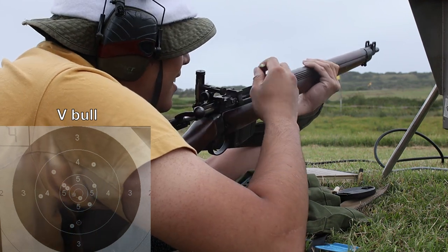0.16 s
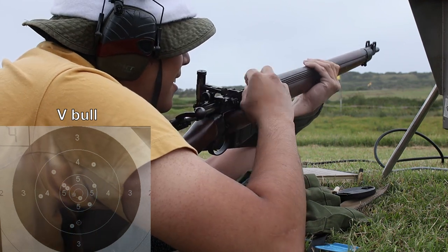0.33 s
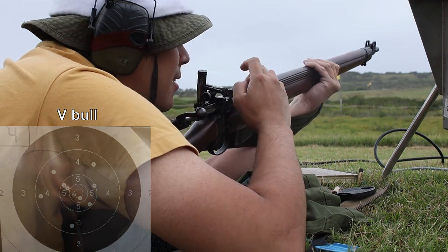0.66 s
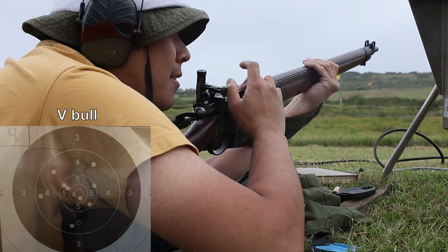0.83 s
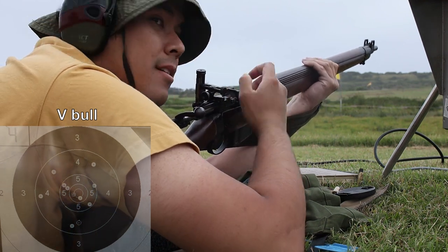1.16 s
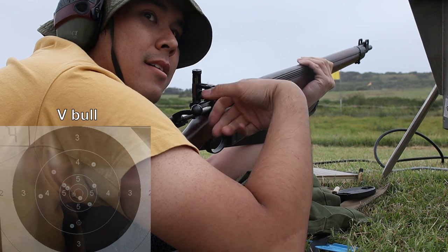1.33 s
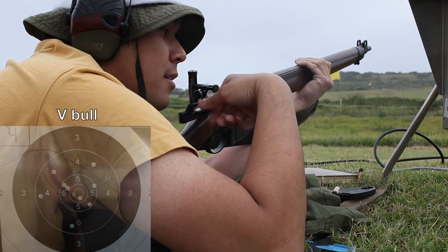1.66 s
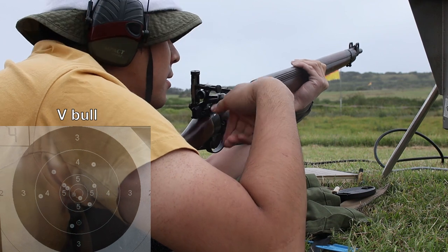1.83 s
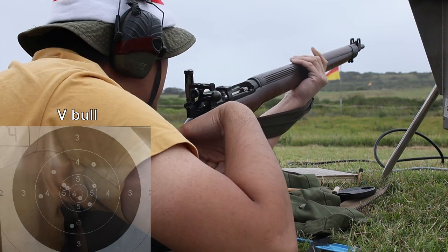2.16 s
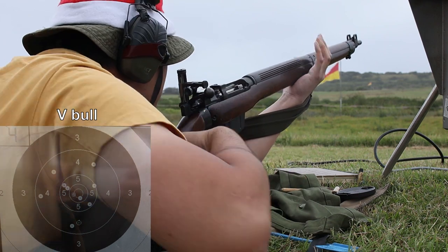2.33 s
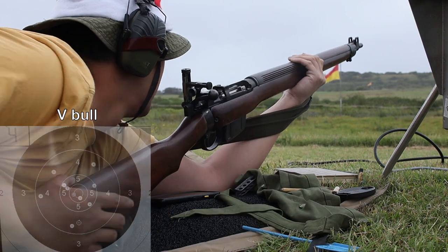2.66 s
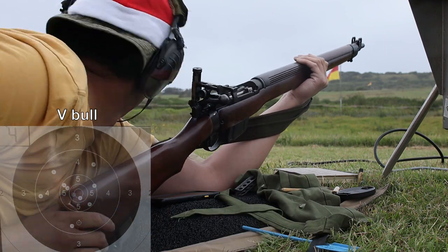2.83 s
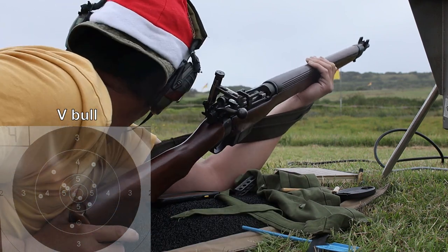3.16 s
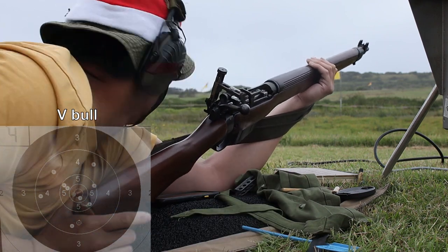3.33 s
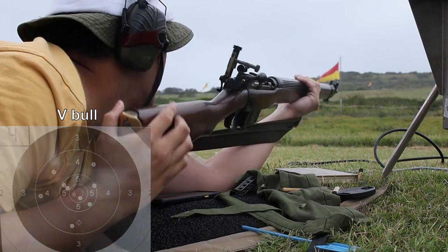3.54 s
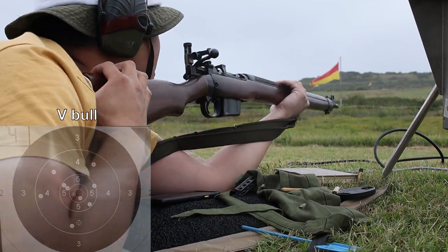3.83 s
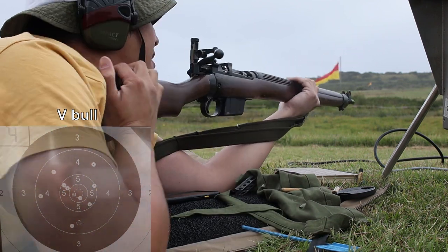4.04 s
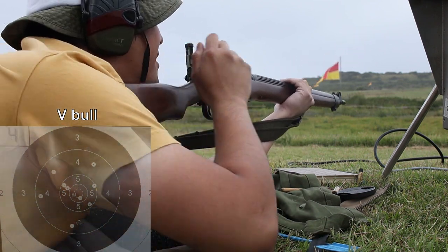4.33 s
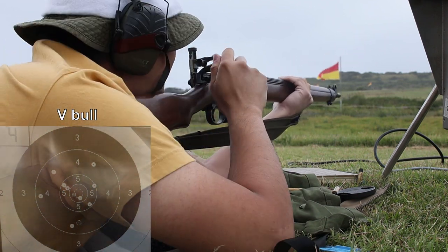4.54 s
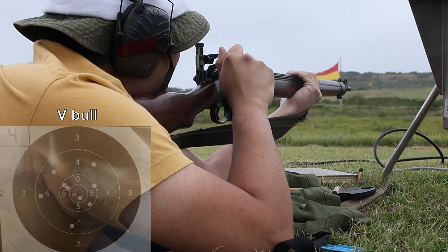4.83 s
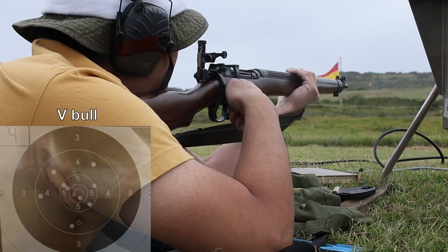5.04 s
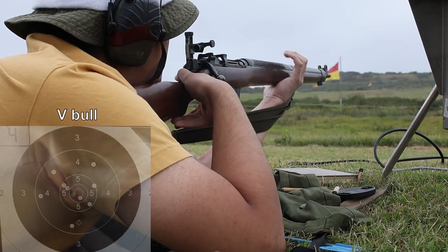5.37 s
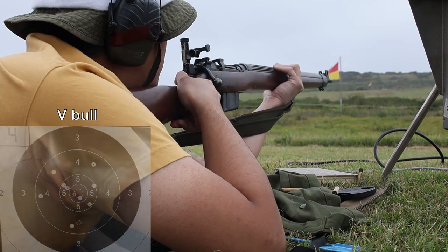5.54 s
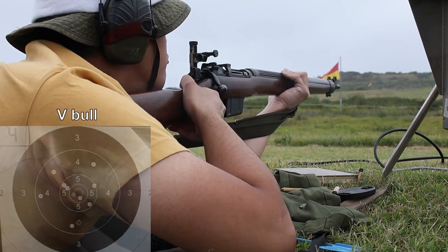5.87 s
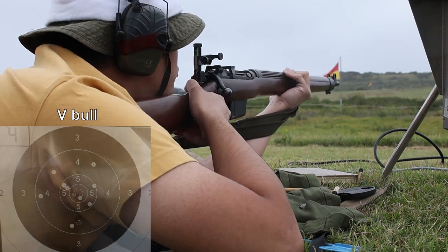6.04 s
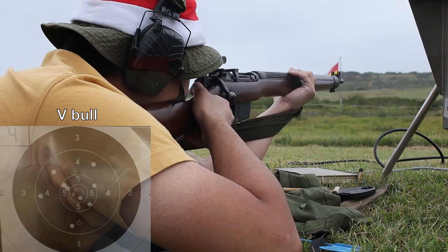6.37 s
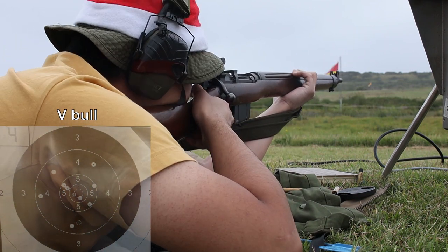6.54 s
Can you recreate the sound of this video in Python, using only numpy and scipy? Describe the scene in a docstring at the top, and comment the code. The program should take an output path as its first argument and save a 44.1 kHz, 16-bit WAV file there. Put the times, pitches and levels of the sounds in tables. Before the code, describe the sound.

Close stereo microphones hear hands handling a bolt-action rifle outdoors: faint far thuds, small brass ticks, hard steel clacks and scrapes. A loud nearby gunshot follows, its noisy echo spreading over banks and bushes, then a heavier shot. Two crisp bolt knocks come before three overlapping shots in quick succession, with echoes fading into light wind.

```python
"""Neighbours' gunshots on an open grass range: each a clipped crack, a low slowing blast and a spray of gas.
Banks and bushes answer with hissing, crackling noise echoes; flat faces slap back short wave packets.
Close by, hands load cartridges and work a steel rifle bolt: struck modes, contact noise and sliding noise.
Light wind, a drone, hiss and far thuds fill the gaps, all shaped from noise or short wave packets.
Two microphone ports a finger apart feed a recorder that reshapes the stereo width and widens the treble."""
import sys
import numpy as np
from scipy import signal
from scipy.fft import rfft, irfft, next_fast_len
from scipy.io import wavfile
from scipy.ndimage import uniform_filter1d

SR = 44100
rng = np.random.default_rng(int(sys.argv[2]) if len(sys.argv) > 2 else 0)


def log_audio(samples):
    """Write samples as a 16-bit WAV file to the path given in sys.argv[1]."""
    # one column per channel
    frames = np.atleast_2d(samples).T
    # limit to full scale, then quantise
    limited = np.clip(frames, -1, 1)
    pcm = np.round(limited * 32767).astype(np.int16)
    wavfile.write(sys.argv[1], SR, pcm)


N = 295558
T = np.arange(N) / SR  # seconds

# Levels are mix levels ahead of the recorder; every pan_db is left minus right.
# Wind gusts: start_s, level_db, deep_db (below DEEP_HZ against the rest)
WIND_LEVELS = [(0.0, -59, -4), (0.59, -63.5, 1), (1.7, -61, -1), (2.4, -60, -2.5), (3.6, -56.5, -1),
               (4.2, -62.5, 1), (4.7, -60.5, 1), (5.5, -55.5, 2.5), (6.2, -59, 8), (6.7, -58, 14)]
# Tone of the open air, shared by wind and hiss: pitch_hz, level_db (per Hz, relative)
AIR_TONE = [(15, -31), (25, -6.5), (97, 3), (236, 0), (476, -18.5), (911, -19), (988, -19), (1940, -24),
            (2410, -25), (4030, -30.5), (5000, -33.5), (11600, -35.5), (13500, -48.5), (16000, -76.5)]
# Tone of the low drone: pitch_hz, level_db (per Hz, relative)
DRONE_TONE = [(50, -30.5), (85, -4), (122, 0.5), (160, -4.5), (220, -9.5), (330, -38.5)]
# Drone fader: start_s, level_db
DRONE_FADER = [(0, -63), (2, -75.5), (4, -58), (5.2, -59), (5.9, -53.5), (6.7, -54)]
DEEP_HZ, HISS_DB = 80, -59

# Far thuds: start_s, level_db, pitch_hz
FAR_THUDS = [(0.068, -52, 150), (0.136, -44, 290), (0.168, -45.5, 300), (0.319, -38.5, 310),
             (0.343, -39, 164), (0.387, -41.5, 277), (0.898, -41, 664), (1.083, -42, 202),
             (1.288, -42.5, 290), (1.541, -39.5, 248), (1.655, -26, 236), (2.276, -41, 154),
             (2.343, -35.5, 222), (2.515, -42, 252), (2.564, -36, 332), (2.716, -39, 380),
             (2.752, -33, 238), (2.763, -37.5, 330), (3.057, -40.5, 256), (3.313, -40, 152.6),
             (3.355, -42, 337), (3.385, -34.5, 209), (3.459, -48.5, 171), (3.737, -39.5, 810)]

# Sliding steel and cloth: start_s, length_s, level_db, low_db (low band against high)
SLIDES = [(0.515, 0.07, -54, -13), (0.83, 0.068, -66, 3), (0.952, .25, -58, -2), (1.292, 0.17, -69.5, 13),
          (1.74, 0.18, -69.5, 6), (2.919, 0.13, -65, 7), (3.209, 0.021, -53, -28), (3.289, 0.041, -51, -30),
          (3.427, 0.076, -64.5, 9.5), (4.89, 0.29, -64, -4)]
SLIDE_ATTACK_S, SLIDE_RELEASE_S = 0.018, 0.017

# Cartridges ticking into the magazine: start_s, level_db, pan_db, low_db (trim of modes below 4 kHz)
CARTRIDGE_TICKS = [(0.454, -38.5, 0.5, 11.5), (0.4747, -34, -0.5, 4), (0.491, -41.5, 0, 14),
                   (0.512, -42.5, -2, 12), (.526, -21.5, 1, 4), (0.539, -24.5, 7, -7),
                   (0.5495, -29.5, -4, -11), (0.5613, -40, -0.5, -3)]
# Modes of a brass case: pitch_hz, level_db, t60_s
BRASS_MODES = [(1110, -23, 0.052), (1860, -9, 0.033), (2900, -12.5, 0.021), (5360, -4, 0.065),
               (5390, -6, 0.064), (8800, -20, 0.022)]
BRASS_HELD_S = 0.566  # a thumb stops the ring
BRASS_SCATTER_DB = 2

# Steel on steel: start_s, level_db, low_db, high_db (relative trims), t60_ms, rise_ms (time constant),
# part_hz and part_db (ring of the struck part), stock_db (against the knock's peak)
BOLT_KNOCKS = [(0.5247,-11.5,-6.5,2.5,55,0.67,4020,-5.5,-14.5),(0.582,-40,-7,-28,14,0.49,1470,0,-30),(0.635,-32.5,-3,5,25,0.84,4120,-5,-18),(0.8373,-19,-11.5,-6.5,14,1,10900,-30,-18.5),
               (0.942,-37.5,-1,-2,24,1.6,1184,0,-15),(0.9534,-33,-3,-5,12,.7,3860,-5,-25),(0.981,-27,7.5,-10,60,1,3000,-4,-9),(0.991,-23,-3.5,-7,42,0.47,5430,-8,-29.5),
               (1.0014,-4,-8.5,1.5,33,3,3270,-2.5,-27),(1.047,-24,-13,-6,57,0.67,1250,-6,-18),(1.071,-23.5,-16,-6,25,1.1,1130,-4,-29),(1.113,-40,-6,3,33,.7,2370,-1,-25),
               (1.122,-40,0,-6,25,.7,1500,-3,-10),(1.1391,-22.5,-5,-29,17,0.99,2980,-1,-26),(1.1616,-29,6,-16,27,0.94,2590,-1,-20),(1.17,-9.5,-6.5,1,29,0.83,2280,-7.5,-24),
               (1.3918,-33,30,-31,8.7,0.9,810,-10,-18),(1.503,-37.5,7,-39,9.2,.9,1248,-10,-20),(1.55,-39.5,-1,-7,33,0.44,1220,-7,-18),(1.704,-25.5,-12.5,-10,26,0.36,5640,0,-22),
               (1.717,-29.5,-2.5,-16,51,1.04,1384,-13.5,-15),(1.7215,-23.5,-17.5,-14,19,1.8,1390,-4,-14),(1.741,-28,-4.5,-11,59,0.5,2380,-5,-20),(1.7541,-28,-2,-8,30,1.4,1313,-4.5,-19.5),
               (1.7602,-16.5,-5.5,-1,24,1.2,2840,0.5,-26),(1.764,-9,-14.5,-2,25,1.2,10760,-14,-18),(1.7734,-11.5,-10.5,-11.5,59,0.7,10700,-6,-19),
               (1.788,-15,-5.5,-9,45,2.3,1815,-18,-23),(1.793,-5,-12.5,3.5,59,1.3,1870,-10.5,-21),(1.8065,-4.5,-8,-1,32,1.3,9880,-6.5,-24),(1.8283,-24.5,-21,-20.5,56,0.95,1076,-10.5,-22.5),
               (1.8462,-22,-11.5,-7,38,1,8500,-14,-16),(1.898,-38.5,-1,-3,19,0.92,2500,-10,-22),(4.6794,-40,7,7,28,0.26,810,9,-8),(4.8897,-38,-17,-8,21,1.6,2713,0,-25),
               (4.9103,-35,-6,-19,54,1.6,2368,-6,-17),(4.923,-33,3,-17.5,47,0.71,2550,-4,-10),(4.937,-9,-6,-3,20.3,0.76,2440,-12.5,-20.5),(5.0641,-20.5,-9.5,-7,49,0.77,2700,-15,-16),
               (5.0984,-24,-1,-14,13,0.81,1830,-6,-13),(5.1095,-3,-4,0,19,0.42,940,-11,-10.5),(5.1554,-45,-6,0,30,1,4100,1,-25)]
# Modes of bolt and receiver, before the grip damps them: pitch_hz, level_db, t60_s
ACTION_MODES = [(945, -3, 0.056), (1075, 6.5, 0.04), (1335, -2, 0.031), (1484, -11.5, 0.069),
                (1915, -2, 0.066), (2030, 3, .08), (2587, 6, 0.04), (3170, 4.5, 0.04), (3432, -3.5, 0.051),
                (3808, 0, 0.042), (4130, 4, 0.039), (4430, -2.5, 0.046), (5035, 3.5, .035),
                (5540, 8, 0.022), (6650, -0.5, .04), (8500, -3.5, 0.02), (10320, 6.5, 0.022),
                (11440, 6.5, 0.031)]
# Modes of wooden stock and barrel answering a knock: pitch_hz, level_db, t60_s
STOCK_MODES = [(441, -12.5, .05), (558, -10.5, 0.018), (646, -0.5, 0.04), (903, -7.5, .022),
               (1184, -9.5, .02), (2090, -23.5, 0.25)]
ACTION_SCATTER_DB, STOCK_SCATTER_DB = 3, 1
STOCK_RISE_MS, KNOCK_PAN_DB = 1.4, -0.5
TAIL_DB, TAIL_T60_S = -27.5, 0.12  # rattle that follows a knock
STRUCK_WIDTH_HZ = 200  # bandwidth of the struck part's ring
GRIP_SHARE = 8.5  # t60 of the grip's damping, in knock t60s

# What each shot gets back, in the order of SHOT_EVENTS: far_db, treble_db, rumble_db, pan_db,
# near_bank_s, near_bank_db, lower_band_s (its delay), lower_band_db (against the upper band),
# last_bank_db, slaps_late_ms
SHOT_RETURNS = [(-37, 5.5, -37, -0.5, 0.058, -37, 0.071, 6.5, -49, 2.45),
                (-35.5, 6, -33.5, -2.5, 0.072, -32.5, 0.082, 3.5, -31.5, 4),
                (-43, -1, -34, -0.5, 0.049, -41.5, 0.049, 10.5, -60, -1),
                (-40.5, 6, -33, -2.5, 0.049, -42, 0.046, 13, -46, -0.1),
                (-40, 9, -37, -4.5, 0.058, -38.5, 0.05, 13, -34.5, 3)]
# Echo of the far banks and bushes: delay_s, level_db, dark_db (below SPLIT_HZ against above), crackle_db
FAR_BANKS = [(.12, -9, -1, -1), (.22, -7.5, -8.5, -27), (.272, -2.5, -5, -11), (0.279, 3.5, -6.5, -2),
             (.325, -6, 0, -2), (.36, -7, 0.5, -11.5), (.44, -9, -6.5, -14), (.47, -2, -3, -27),
             (0.499, 0, 0, -29), (.53, -2.5, 0, -10), (.56, -2, -2.5, -12.5), (.59, -2.5, 0.5, -32),
             (0.624, -10.5, 3, -2), (0.644, -13, -7, -2), (.8, -18.5, -2.5, -27), (1.05, -23, -2, -10),
             (1.7, -28.5, 4, -7)]
# Echo tones, middle, treble and rumble: pitch_hz, level_db (per Hz, relative)
ECHO_MID_TONE = [(240, -49), (400, -32), (665, -17.5), (830, -8), (933, -8.5), (1420, -1.5), (2260, 2.5),
                 (3810, 2.5), (9000, -13.5), (11700, -48), (19800, -120)]
ECHO_TREBLE_TONE = [(2940, -29), (5000, 4.5), (8380, -1.5), (11800, -0.5), (13900, -15), (14800, -41),
                    (16000, -93)]
ECHO_RUMBLE_TONE = [(30, -31), (70, -5), (130, 6), (250, 2.5), (400, -12.5), (600, -41)]
# Scatter from the ground around the muzzle: level against the near bank, dark band against bright
FIRST_DB, FIRST_T60_S, FIRST_DARK_DB = -16.5, 0.76, 17
SPLIT_HZ = 2250  # dark band below, bright band above
NEAR_RISE_S, NEAR_T60_S = 0.027, 0.68
NEAR_DARK_RISE_S, NEAR_DARK_T60_S = 0.0048, 0.27
LAST_BANK_S, LAST_BANK_WIDTH_S = 0.612, 0.023
TREBLE_LOSS_DB_S, TREBLE_FLOOR_DB = 45.5, -45
UPPER_HZ, UPPER_LOSS_DB_S = 9250, 29  # echo above this fades faster still, by this much more
RUMBLE_RISE_S, RUMBLE_T60_S = 0.018, 0.56
LEFT_LOSS_DB_S = 1  # the echo leans right with time
CRACKLE_PER_S, CRACKLE_HZ = 200, 1950
CRACKLE_SPREAD_DB, CRACKLE_TOP_SHARE = 1, 0.96  # shape and upper limit of the click sizes

# Flat faces that slap back every shot: delay_s, pitch_hz, pan_db, level_db (one for each shot)
SLAP_FACES = [(0.247, 1670, 11, [-30, -31, -14, -29, -30]),
              (0.2782, 2340, 0.5, [-27, -10, -19, -16.5, -12.5]),
              (0.4811, 2110, 1, [-13.5, -16.5, -31, -18.5, -53]),
              (.905, 1650, 1.5, [-30, -30.5, -37.5, -38, -33]),
              (1.041, 2070, 4, [-34.5, -29.5, -33, -42, -42])]
# Further slaps: some are single shots' returns from the flat faces, at their own times; the rest come from lone
# spots about the range: start_s, level_db, pitch_hz, pan_db
FURTHER_SLAPS = [(2.1246, -23.5, 1300, 18), (2.265, -17.5, 3100, 1), (2.21, -30, 1900, 3),
                 (2.171, -27, 2300, 0), (2.18, -29, 1600, 3), (2.185, -26, 2400, 0), (2.201, -28, 2300, 2),
                 (2.485, -35.5, 1500, 3), (2.575, -32.5, 1310, -1), (4.116, -31, 1500, 2),
                 (4.145, -25, 2400, 0), (4.436, -30, 2500, 0), (2.384, -20, 2890, -5), (2.389, -37, 1500, 1),
                 (2.999, -30.5, 3800, -2), (4.0577, -22, 2200, 2), (4.3028, -25, 1730, 2),
                 (4.328, -19, 2600, 0), (4.421, -18, 3040, 0), (6.046, -21.5, 2510, -7),
                 (6.2805, -22, 1910, 4), (6.302, -36, 1900, 0), (2.402, -28, 2100, 3), (2.408, -30, 2000, 3),
                 (2.424, -26, 2200, 1), (2.43, -31, 1900, 3), (2.476, -34.5, 1620, 16), (2.62, -20, 2900, 4),
                 (2.631, -25.5, 1970, 6), (2.9295, -38, 2110, 1), (3.42, -27.5, 2020, -1),
                 (3.551, -46, 1290, -10), (3.592, -36.5, 1430, 4), (3.849, -18.5, 1890, 10),
                 (3.902, -21, 2160, 4), (4.066, -18.5, 2430, -2), (5.842, -32, 1730, -4),
                 (6.453, -27, 2240, 1), (4.785, -17, 3130, -8.5), (5.644, -24.5, 2430, 11),
                 (6.007, -19, 2670, -5), (6.219, -27, 3500, -10), (6.4427, -19, 3530, -7),
                 (6.5863, -22, 3900, 0)]
SLAP_EDGE_DB = -9  # bright front of a slap

# Gunshots: start_s, crack_db, crack_ms, blast_hz (starting pitch), slow_ms (blast slowing time), blast_db,
# length_ms, spray_db, lag_samples (between ports), width_db (extra width of bass and middle),
# fall (power of time in the blast's dying), ripple_db, rise_ms (time constant)
SHOT_EVENTS = [(2.1056, -3.5, 0.63, 388, 3.5, -7.5, 5.7, -11, 3.9, 1, 3.4, -27, 1.4),
               (3.8148, 0.5, 0.7, 255, 120, -2, 5.6, -13, 3.8, 9.5, 1.43, -31.5, 0.87),
               (5.5952, -7, 0.69, 293, 3.6, -5, 8.9, -14, 4.5, 9, 2.2, -24, 1.13),
               (5.705, -5, .65, 300, 4.5, -6, 8.1, -15, 2.8, 12.5, 2.3, -29, 1.3),
               (5.791, -3, 0.83, 414, 1.86, -12.5, 9.2, -14.5, 4.4, 20, 2.2, -20, 1.5)]
# Tone of the gas spray: pitch_hz, level_db (per Hz, relative)
SPRAY_TONE = [(240, -74), (400, -9), (676, -16), (1010, -13), (3870, -16.5), (4310, -14), (5960, -18.5),
              (10200, -27.5), (16000, -53)]
CRACK_FRONT, BOUNCE_MS, BOUNCE = 0.69, 0.4, 0.41  # front height; delay and share of the ground bounce
BLAST_BALANCE = 0.8  # share of the blast's net push that its suction takes back
RIPPLE_HZ, RIPPLE_T60_S = 1330, 0.032  # a ripple that rides on the blast
SPRAY_T60_MS, TREBLE_WIDTH_DB = 39.8, -4

# Recorder's stereo width: pitch_hz, side_db (gain on left minus right)
WIDTH_CURVE = [(300, -14.5), (1000, -5.5), (2500, 7), (6000, 6.5), (14000, 9.5)]
BASS_CUT_HZ, TOP_HZ = 59, 16300


def undb(db):
    """Decibels to amplitude gain."""
    return 10 ** (np.asarray(db) / 20)


def unit(x):
    """Scale to an RMS of 1."""
    return x / np.sqrt(np.mean(x ** 2))


def gain(points, size):
    """Gain of (Hz, dB) points at every bin of a transform."""
    hz, db = np.transpose(points)
    bin_hz = np.arange(size // 2 + 1) * SR / size
    return undb(np.interp(np.log(bin_hz + 1), np.log(hz), db))


def colour(x, points):
    """Equalise with a curve of (Hz, dB) points."""
    size = next_fast_len(x.shape[-1])
    return irfft(rfft(x, size) * gain(points, size), size)[..., :x.shape[-1]]


def ports(x, lag, pan_db=0):
    """The left port hears the sound lag samples after the right."""
    size = next_fast_len(x.shape[-1])
    sign = np.array([[1], [-1]])
    turn = np.exp(-1j * np.pi * np.arange(size // 2 + 1) / size * lag * sign)
    return irfft(rfft(x, size) * turn, size)[:, :x.shape[-1]] * undb(sign * pan_db / 2)


def noise(size, alike):
    """Two noises that share the part alike of their power."""
    shared, left, right = rng.standard_normal((3, size))
    alike = np.clip(alike, 0, 1)
    return np.sqrt(alike) * shared + np.sqrt(1 - alike) * np.array([left, right])


def walk(rate):
    """Random levels, rate of them a second, joined by slewing; spread near 1."""
    hold = int(SR / rate)
    steps = np.repeat(rng.standard_normal(N // hold + 1), hold)
    return 1.56 * uniform_filter1d(steps, hold)[:N]


def fade(t, t60):
    """Exponential decay, 60 dB down after t60."""
    return np.exp(-np.log(1000) * t / t60)


def add(out, s, x):
    """Mix x into out from s seconds."""
    i = int(s * SR)
    out[:, i:i + x.shape[-1]] += x[..., :N - i]


def puff(hz, turns, size=1024):
    """A short wave packet of a few turns under a bell-shaped envelope."""
    t = np.arange(size) / SR * hz
    return -np.cos(2 * np.pi * (t - turns)) * np.exp(-(2 * (t - turns) / turns) ** 2)


def ring(modes, t, scatter_db, detune_share):
    """Impulse response of a mode table; each blow and each port meets the modes differently."""
    hz, db, t60 = (column[:, None] for column in np.transpose(modes))
    size, phase, detune = rng.standard_normal((3, len(modes), 1))
    lean = 0.31 * rng.standard_normal((2, len(modes), 1))  # phase offset at each port
    level = undb(db + scatter_db * size) * fade(t, t60)
    wave = np.sin(2 * np.pi * hz * (1 + detune_share * detune) * t + phase + lean)
    return np.sum(level * wave, axis=1)


def air():
    """Wind rumble and a far drone, largely alike in both ports, and a soft hiss that is not."""
    when, level_db, deep_db = np.transpose(WIND_LEVELS)
    rumble = unit(colour(colour(noise(N, 0.86), AIR_TONE), [(350, 2.5), (500, -43.0)]))
    deep = colour(rumble, [(DEEP_HZ / 1.5, 0), (DEEP_HZ * 1.5, -30)])
    rumble = rumble + (undb(np.interp(T, when, deep_db)) - 1) * deep
    wind = rumble * undb(np.interp(T, when, level_db) + 0.85 * walk(9.9) + 1.5 * walk(60))
    drone = unit(colour(noise(N, 0.77), DRONE_TONE)) * undb(np.interp(T, *np.transpose(DRONE_FADER)))
    hiss = unit(colour(colour(noise(N, 0.11), AIR_TONE), [(300, -22.5), (400, -3.0)]))
    return wind + drone + hiss * undb(HISS_DB + 2.2 * walk(3.6))


def thuds():
    """Far blasts keep only their bass: a low wave packet and a weaker one above it."""
    out = np.zeros((2, N))
    for s, db, hz in FAR_THUDS:
        thud = puff(hz, turns=1.09) + undb(-8) * puff(2.24 * hz, turns=1.28)
        add(out, s - 0.001, undb(db) * ports(thud, 6.9))
    return out


def slide():
    """Dense uneven catches of rubbing surfaces, as flickering noise in two bands."""
    catches = noise(N, 0.6) * undb(1.1 * walk(250))
    high_curve = [(1000, -6), (1800, 15.5), (4000, 4.5), (7000, -13.5), (12000, -36.0), (15500, -39.5)]
    high = unit(colour(catches, high_curve))
    low = unit(colour(catches, [(350, -0.5), (650, 5.5), (1300, -1.5), (2000, -15.0)]))
    out = np.zeros((2, N))
    for s, length, db, low_db in SLIDES:
        corners_s = [-SLIDE_ATTACK_S, 0, length, length + SLIDE_RELEASE_S]
        shape = np.interp(T - s, corners_s, [0, 1, 1, 0])
        out += shape * undb(db) * (high + undb(low_db) * low)
    return out


def brass():
    """Thin cartridge cases ring on a few modes along with a dry noise tick."""
    out, t = np.zeros((2, N)), np.arange(4096) / SR
    for s, db, pan_db, low_db in CARTRIDGE_TICKS:
        modes = [(hz, mode_db + low_db * (hz < 4000), t60) for hz, mode_db, t60 in BRASS_MODES]
        tick = noise(len(t), 0.91) * fade(t, 0.02)
        tick = colour(tick, [(600, -27), (1500, 3.5), (11000, 3.5), (15500, -30)])
        case = ring(modes, t, BRASS_SCATTER_DB, detune_share=0.002)
        add(out, s, undb(db) * ports(case + 0.71 * tick, 0.67, pan_db))
    return out * fade(np.maximum(T - BRASS_HELD_S, 0), 0.045)


def bolt():
    """Each knock is a rattling contact of a few ms that drives the steel modes and sounds itself."""
    out, t = np.zeros((2, N)), np.arange(4096) / SR
    ms = t * 1000
    for s, db, low_db, high_db, t60_ms, rise_ms, part_hz, part_db, stock_db in BOLT_KNOCKS:
        decay = fade(t, t60_ms / 1000) + undb(TAIL_DB) * fade(t, TAIL_T60_S)
        contact = noise(len(t), 0.95) * decay * (1 - np.exp(-ms / max(rise_ms, 0.05))) ** 2
        action = ring(ACTION_MODES, t, ACTION_SCATTER_DB, detune_share=0.011)
        action = action * fade(t, GRIP_SHARE * t60_ms / 1000)
        rung = signal.fftconvolve(contact * fade(t, 0.018), action, axes=1)[:, :len(t)]
        knock = unit(contact) + undb(-5.5) * unit(rung)
        knock = colour(knock, [
            (250, low_db - 21.5), (500, low_db - 3), (850, low_db + 5), (1200, low_db + 10.0),
            (2200, 0.84), (3400, 2.0), (4500, 2.6),
            (6500, high_db), (11500, high_db), (15500, high_db - 24.0)])
        resonator = signal.iirpeak(part_hz, part_hz / STRUCK_WIDTH_HZ, SR)
        part = signal.lfilter(*resonator, contact * fade(t, TAIL_T60_S))
        knock = unit(knock) + undb(part_db) * unit(part)
        stock = ring(STOCK_MODES, t, STOCK_SCATTER_DB, detune_share=0.01)
        stock = stock * (1 - np.exp(-ms / STOCK_RISE_MS))
        blow = knock / np.abs(knock).max() + undb(stock_db) * stock
        add(out, s, undb(db) * ports(blow, 0.81, KNOCK_PAN_DB))
    return out


def bank(t, delay, rise, t60):
    """Swell of an echo from a bank: up to its delay, then dying away."""
    return fade(np.maximum(t - delay, 0), t60) * np.exp(np.minimum(t - delay, 0) / rise)


def grain():
    """Random flutter of an echo's level, slow and fast."""
    return undb(0.82 * walk(50) + 1.6 * walk(300))


def echo_powers():
    """Power envelopes of the echo bands, summed over the shots; the treble fades fastest."""
    dark, bright, treble, upper, crackle = np.zeros((5, 2, N))
    rumble = np.zeros(N)
    delay, level_db, dark_db, crackle_db = np.transpose(FAR_BANKS)
    for (s, *_), returns in zip(SHOT_EVENTS, SHOT_RETURNS):
        far_db, treble_db, rumble_db, pan_db, near_s, near_db, deep_s, deep_db, last_db, _ = returns
        t = np.maximum(T - s, 0)
        sides = (t > 0) * undb(np.array([[1], [-1]]) * (pan_db - LEFT_LOSS_DB_S * t) / 2)
        first = sides * undb(near_db + FIRST_DB) * fade(t, FIRST_T60_S)
        near = sides * undb(near_db) * bank(t, near_s, NEAR_RISE_S, NEAR_T60_S)
        deep = sides * undb(near_db + deep_db) * bank(t, deep_s, NEAR_DARK_RISE_S, NEAR_DARK_T60_S)
        last = sides * undb(last_db) * np.exp(-((t - LAST_BANK_S) / LAST_BANK_WIDTH_S) ** 2)
        far = sides * undb(far_db + np.interp(t, delay, level_db)) * (t > near_s)
        power = first ** 2 + near ** 2 + far ** 2 + last ** 2
        bright += power
        far_dark = far * undb(np.interp(t, delay, dark_db))
        dark += (first * undb(FIRST_DARK_DB)) ** 2 + deep ** 2 + far_dark ** 2
        treble += power * undb(np.maximum(treble_db - TREBLE_LOSS_DB_S * t, TREBLE_FLOOR_DB)) ** 2
        upper += power * undb(treble_db - (TREBLE_LOSS_DB_S + UPPER_LOSS_DB_S) * t) ** 2
        crackle += (far * undb(np.interp(t, delay, crackle_db))) ** 2
        swell = fade(t, RUMBLE_T60_S) * (1 - np.exp(-(t / RUMBLE_RISE_S) ** 2))
        rumble += (t > 0) * (undb(rumble_db) * swell) ** 2
    return dark, bright, treble, upper, crackle, rumble


def echoes():
    """Countless small reflections: grainy noise in bands and a crackle of single returns."""
    dark, bright, treble, upper, crackle, rumble = (np.sqrt(power) for power in echo_powers())
    middle_noise = ports(unit(colour(noise(N, 0.43), ECHO_MID_TONE)), 2.75)
    dark_noise = colour(middle_noise, [(SPLIT_HZ / 1.05, 0), (SPLIT_HZ * 1.58, -20), (SPLIT_HZ * 2, -60)])
    treble_noise = ports(unit(colour(noise(N, 0.51), ECHO_TREBLE_TONE)), 3.7)
    lower_noise = colour(treble_noise, [(UPPER_HZ / 1.02, 0), (UPPER_HZ * 2.14, -40)])
    bass_noise = unit(colour(noise(N, 0.98), ECHO_RUMBLE_TONE))
    when, size = rng.random((2, N))
    click_size = (1 - CRACKLE_TOP_SHARE * size) ** (-CRACKLE_SPREAD_DB / 20 * np.log(10))
    clicks = (when < CRACKLE_PER_S / SR) * click_size
    snaps = np.convolve(clicks, puff(CRACKLE_HZ, turns=1.53, size=128))[:N]
    out = dark * grain() * dark_noise
    out += bright * grain() * (middle_noise - dark_noise)
    out += grain() * (treble * lower_noise + upper * (treble_noise - lower_noise))
    out += crackle * ports(unit(snaps), 5.0)
    return out + rumble * undb(1.3 * walk(40)) * bass_noise


def slaps():
    """A flat face returns the crack dulled: a wave packet with a brighter edge."""
    out = np.zeros((2, N))
    face_slaps = []
    for delay, hz, pan_db, levels_db in SLAP_FACES:
        for shot, returns, db in zip(SHOT_EVENTS, SHOT_RETURNS, levels_db):
            late_ms = returns[-1]
            face_slaps.append((shot[0] + delay + late_ms / 1000, db, hz, pan_db))
    for s, db, hz, pan_db in face_slaps + FURTHER_SLAPS:
        if s < N / SR:
            slap = puff(hz, turns=1.275) + undb(SLAP_EDGE_DB) * puff(1.92 * hz, turns=1.7)
            add(out, s, undb(db) * ports(slap, 2.26, pan_db))
    return out


def shots():
    """N-shaped crack, its bounce off the ground, a blast that slows as it spreads, a spray of gas."""
    out, t = np.zeros((2, N)), np.arange(4096) / SR
    ms = t * 1000
    lead = 256  # samples of silence ahead, room for the port lag
    for (s, crack_db, crack_ms, blast_hz, slow_ms, blast_db, length_ms,
         spray_db, lag, width_db, fall, ripple_db, rise_ms) in SHOT_EVENTS:
        n_wave = np.where(ms < crack_ms, CRACK_FRONT - (1 + CRACK_FRONT) * ms / crack_ms, 0)
        crack = n_wave - BOUNCE * np.roll(n_wave, int(BOUNCE_MS / 1000 * SR))
        turns = blast_hz * slow_ms / 1000 * np.log(1 + ms / slow_ms)  # pitch falls with time
        rise = 1 - np.exp(-ms / rise_ms)
        swell = np.exp(-(ms / length_ms) ** fall) * rise
        blast = -np.sin(2 * np.pi * turns) * swell
        blast = blast - BLAST_BALANCE * swell * blast.sum() / swell.sum()
        spray = unit(colour(noise(len(t), 0.34), SPRAY_TONE)) * fade(t, SPRAY_T60_MS / 1000)
        ripple = np.sin(2 * np.pi * RIPPLE_HZ * t) * fade(t, RIPPLE_T60_S) * rise
        shot = undb(crack_db) * crack + undb(ripple_db) * ripple
        shot = shot + undb(blast_db) * blast + undb(spray_db) * spray
        left, right = ports(np.pad(shot, ((0, 0), (lead, 0))), lag)
        width = [(1000, width_db), (2800, 0.007), (4500, 0.03), (8000, TREBLE_WIDTH_DB)]
        side = colour((left - right) / 2, width)
        add(out, s - lead / SR, (left + right) / 2 + np.array([side, -side]))
    return out


def scene():
    """The whole range at the two ports, background first."""
    return air() + thuds() + slide() + brass() + bolt() + echoes() + slaps() + shots()


def record(dry):
    """The recorder cuts the deepest bass, reshapes the port difference, clips at full scale and cuts the top."""
    bass_cut = signal.butter(2, BASS_CUT_HZ, "high", fs=SR, output="sos")
    dry = signal.sosfilt(bass_cut, dry)
    mid = (dry[0] + dry[1]) / 2
    side = colour((dry[0] - dry[1]) / 2, WIDTH_CURVE)
    wide = np.clip(np.array([mid + side, mid - side]), -1, 1)
    top_cut = signal.ellip(8, 0.2, 60, TOP_HZ, fs=SR, output="sos")
    return np.clip(signal.sosfilt(top_cut, wide), -1, 1)


dry = scene()
out = record(dry)
log_audio(out)
```